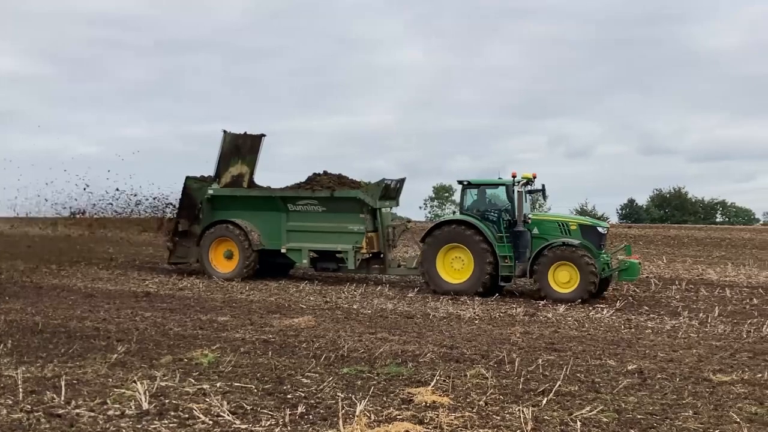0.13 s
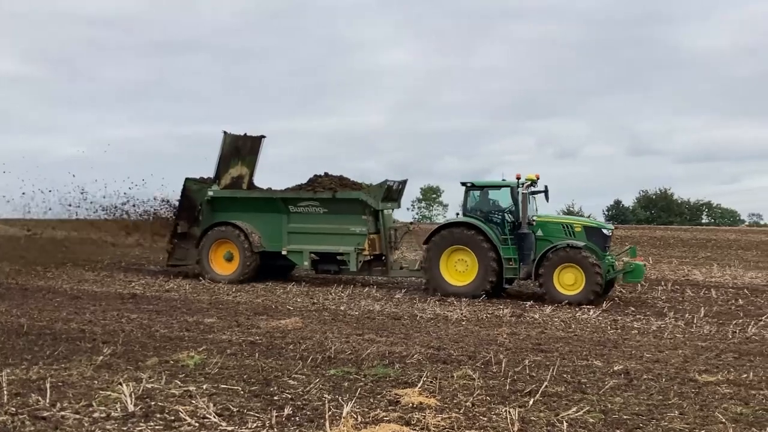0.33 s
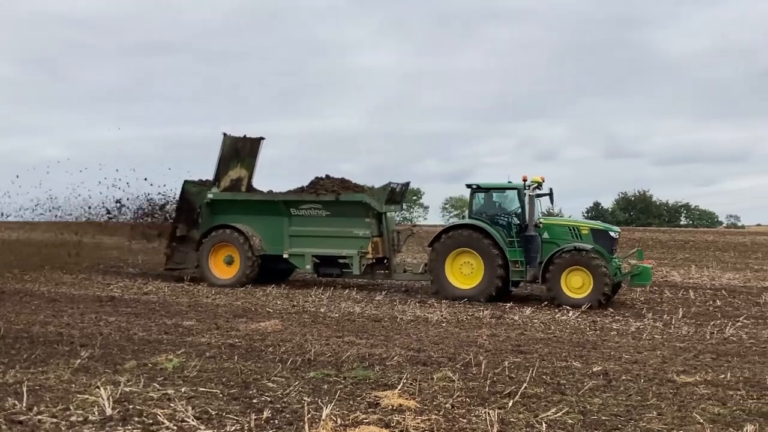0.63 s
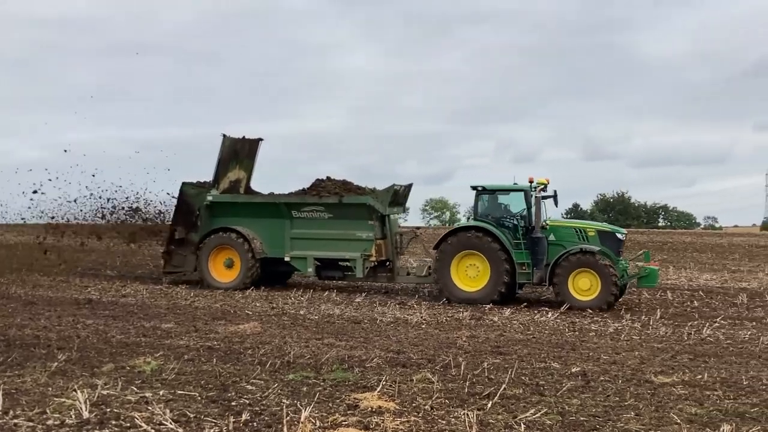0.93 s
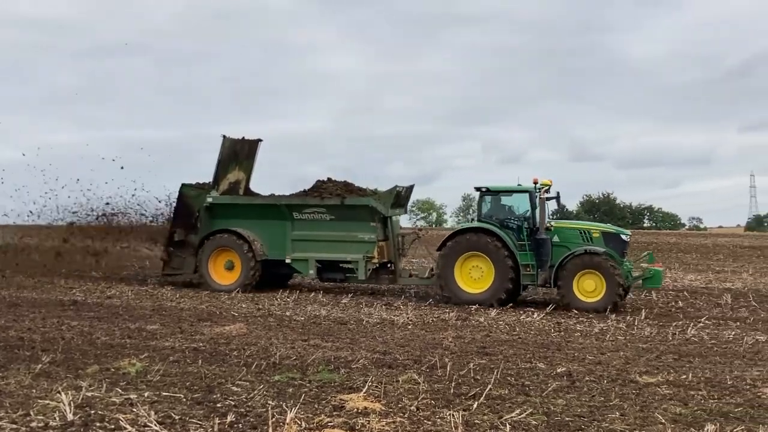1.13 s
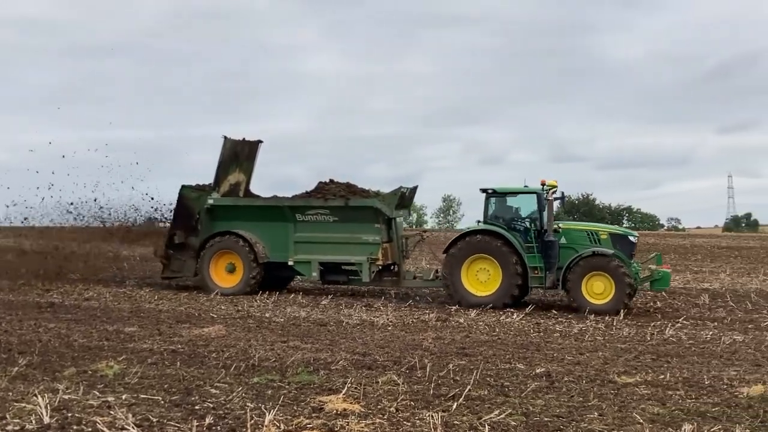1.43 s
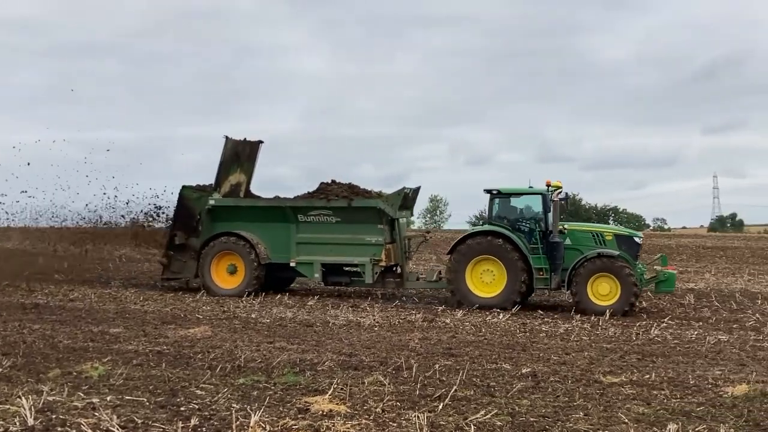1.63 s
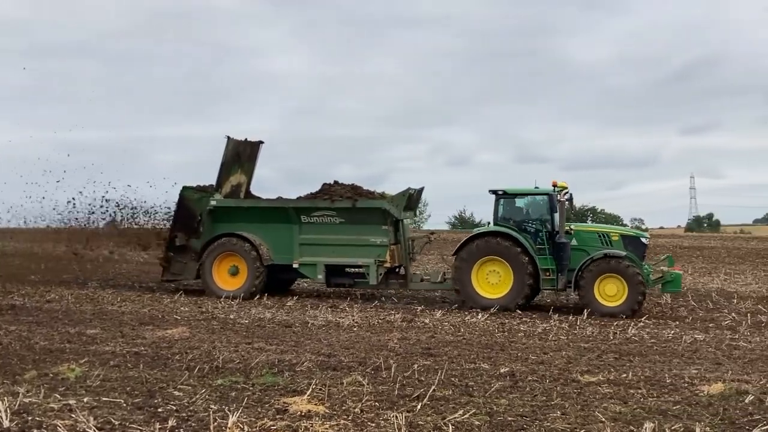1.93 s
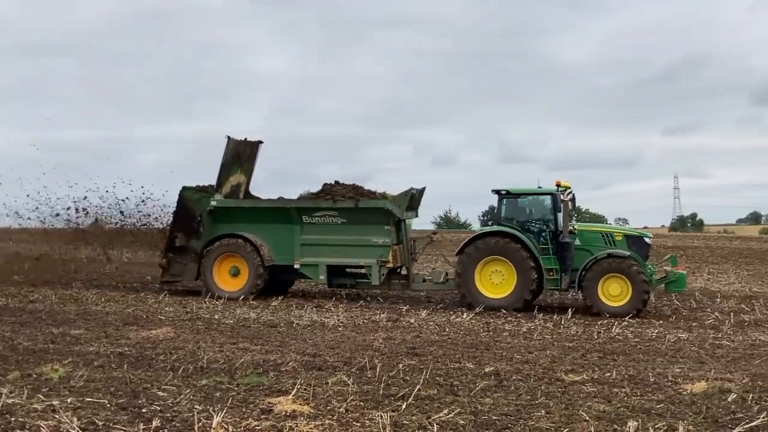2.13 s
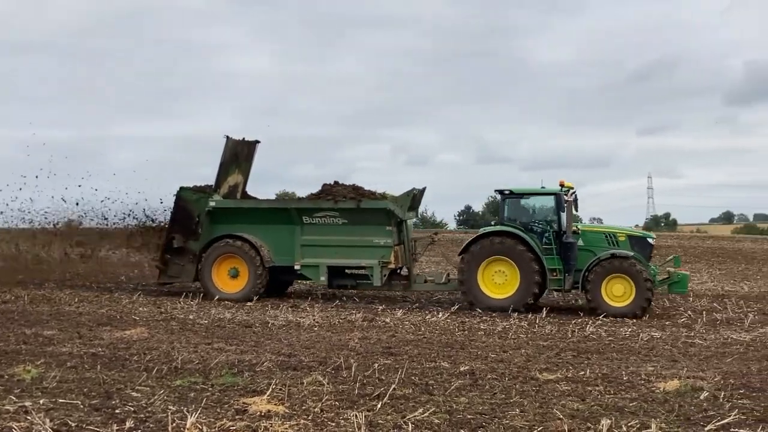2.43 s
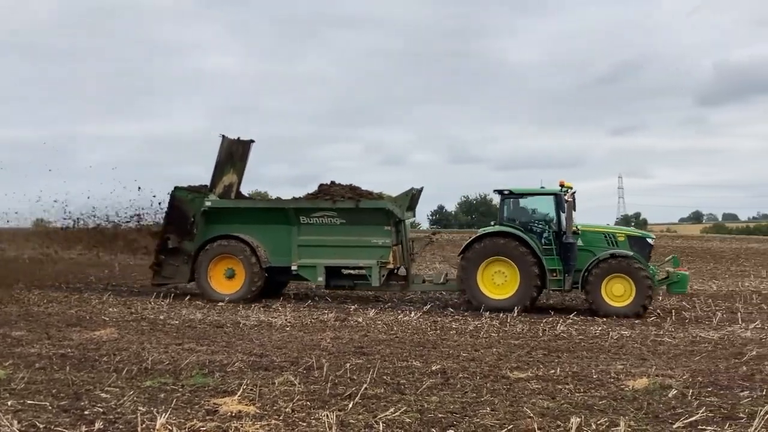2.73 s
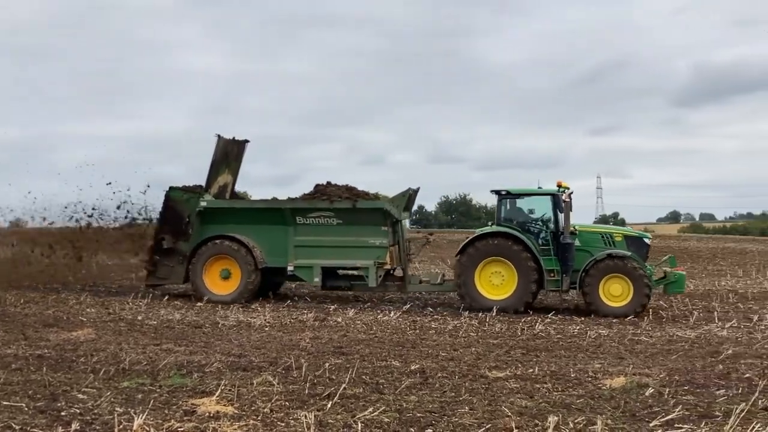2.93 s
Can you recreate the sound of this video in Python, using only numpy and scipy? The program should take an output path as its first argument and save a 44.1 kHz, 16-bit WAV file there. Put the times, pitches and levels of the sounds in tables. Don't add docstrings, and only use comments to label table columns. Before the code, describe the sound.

A tractor and muck spreader drone along with a wavering gear whine, low thumps and pattering clods.

```python
import sys
import numpy as np
from scipy import signal
from scipy.fft import rfft, irfft
from scipy.io import wavfile
from scipy.ndimage import uniform_filter1d

SR = 44100
rng = np.random.default_rng(int(sys.argv[2]) if len(sys.argv) > 2 else 0)


def generate_wav(sig):
    pcm = np.round(np.clip(np.atleast_2d(sig).T, -1, 1) * 32767).astype(np.int16)
    wavfile.write(sys.argv[1], SR, pcm)


def how_loud(loudness_db):
    steps = np.asarray(loudness_db, float) / 20
    return 10 ** steps


N = 136269

# f/Hz, level/dB (per Hz)
ROAR_SPECTRUM = [(28, -19), (60, -4.5), (120, -2.5), (260, -22.5), (660, -17), (1300, -21), (2400, -28),
                 (10000, -50)]
# f/Hz, depth/dB
ROAR_PATCHES = [(300, 2.8), (1000, 2.6), (1500, 1.6), (3000, 2.2)]
# t/s, f/Hz, level/dB
MAIN_WHINE = [(0, 1318, -33), (.12, 1324, -31), (.155, 1332, -45), (.2, 1342, -35), (.45, 1352, -37),
              (.78, 1355, -41), (.85, 1366, -31.5), (1.25, 1366, -33), (1.37, 1348, -31), (1.41, 1361, -46),
              (1.6, 1335, -32), (1.85, 1356, -37), (1.89, 1352, -28.5), (2.4, 1357, -37), (2.58, 1352, -32),
              (2.63, 1350, -50), (2.7, 1360, -32), (3.09, 1364, -33)]
# t/s, f/Hz, level/dB
UPPER_WHINE = [(0, 1660, -43), (.3, 1668, -39), (.55, 1672, -43), (.76, 1680, -48), (.85, 1688, -41),
               (1.36, 1682, -44), (1.55, 1675, -38), (1.62, 1673, -45), (2.5, 1674, -47), (2.83, 1672, -43),
               (3.09, 1675, -46)]
# t/s, f/Hz, level/dB
LOWER_WHINE = [(0, 1150, -43), (.7, 1146, -47), (1.4, 1132, -40.5), (1.9, 1128, -34.5), (2.15, 1138, -44),
               (2.3, 1137, -35.5), (2.47, 1135, -47), (2.62, 1140, -37), (3.09, 1139, -38.5)]
# f/Hz, width/Hz, first level/dB, last level/dB
SIDE_GEARS = [(1985, 40, -41, -54), (1905, 50, -45, -47), (2190, 40, -50, -52), (2385, 50, -53, -53),
              (860, 30, -45, -45), (398, 14, -46, -46), (3770, 50, -45, -56)]
# f/Hz, level/dB (per Hz)
PATTER_SPECTRUM = [(2500, -3), (3800, 3), (6000, -3), (7500, 0), (11000, -3), (13000, -7), (14500, -11),
                   (15700, -20)]
# t/s, level/dB
PATTER_LEVEL = [(0, -38.5), (1.2, -40.5), (2, -37), (2.5, -37), (3.09, -37.5)]
# t/s, peak level/dB, f/Hz, length/s
BLOWS = [(0.004, 0.5, 99, 0.012), (0.03, -21, 71.4, 0.08), (0.155, -5, 124, 0.021),
         (0.192, -7.5, 122, 0.023), (0.236, -12, 126, 0.018), (0.272, -10, 110, 0.028),
         (0.306, -5, 102, 0.017), (0.371, -6, 113, 0.011), (0.415, -10.5, 131.5, 0.024),
         (0.439, -6.5, 105, 0.022), (0.465, -16, 73, 0.04), (0.526, -12, 107.7, 0.059),
         (0.581, -14, 124, 0.044), (0.606, -16.5, 77.5, 0.031), (0.659, -14, 109, 0.02),
         (0.731, -12.5, 105.7, 0.069), (0.954, -13, 129, 0.028), (1.011, -11, 134, 0.03),
         (1.053, -9, 121, 0.012), (1.132, -19, 73.5, 0.076), (1.273, -16, 122, 0.019),
         (1.296, -1, 124, 0.019), (1.373, -11.5, 72.8, 0.023), (1.453, -17, 106, 0.028),
         (1.51, -15.5, 138.6, 0.042), (1.528, -13, 80.4, 0.04), (1.58, -3.5, 80.7, 0.0074),
         (1.688, -16, 68.7, 0.035), (1.719, -18, 112.3, 0.0098), (1.744, -10, 106.5, 0.043),
         (1.806, -22, 130, 0.044), (1.855, -12, 72.5, 0.032), (1.872, -4.5, 95.5, 0.04),
         (1.888, -16, 132.3, 0.031), (1.922, -16.5, 97, 0.042), (2.04, -11.5, 96, 0.0099),
         (2.107, -16.5, 131, 0.04), (2.141, -19, 67.7, 0.044), (2.158, -1, 119, 0.028),
         (2.388, -13.5, 122.2, 0.028), (2.418, -18, 75.5, 0.04), (2.443, -5, 127, 0.028),
         (2.6, -14, 126, 0.044), (2.655, -16, 117, 0.028), (2.713, -4, 128.5, 0.0065),
         (2.73, -6.5, 119, 0.015), (2.887, -12, 96.8, 0.02), (3.016, -10.0, 73, 0.028),
         (3.037, -11.5, 103, 0.028), (3.077, -16.7, 73.8, 0.04)]
# t/s, peak level/dB, struck panel f/Hz
KNOCKS = [(.006, -14, 280), (0.426, -18.5, 401), (.499, -21.5, 680), (.71, -21.5, 640), (1.128, -23.5, 640),
          (1.278, -18.5, 870), (1.284, -20, 674), (1.301, -17.5, 334.5), (1.535, -21, 691),
          (1.56, -16, 328), (1.568, -17, 585), (1.571, -16.5, 872), (1.823, -19, 1260), (1.838, -18.5, 698),
          (1.862, -17, 615), (1.865, -15.5, 302), (1.893, -22.5, 676), (1.892, -17.5, 1153),
          (1.891, -20, 1555), (1.993, -21, 658), (2.148, -14, 660), (2.154, -14.5, 295), (2.415, -19, 317),
          (2.709, -14, 684), (2.806, -23, 634), (2.845, -23, 636), (2.998, -19, 596), (3.003, -18.5, 876),
          (3.005, -19.5, 316), (3.055, -19.5, 352), (3.072, -15, 221.5)]
# f/Hz, level/dB, t60/s
BODY_MODES = [(358, -2, 0.029), (640, 7, 0.031), (860, 8, 0.047), (1120, -18, 0.017), (1620, -19, 0.015),
              (209, 1, 0.046), (435, 11, 0.051)]
# t/s, peak level/dB, brightness/dB
SNAPS = [(.053, -19, -8), (.087, -19, -4), (.487, -15, -3), (.745, -21, -3), (.883, -24, -6),
         (.8888, -15, 0), (1.030, -17, 0), (1.215, -22, 0), (1.346, -21, -5), (1.629, -23, -4),
         (1.683, -23, -5), (1.747, -14, 1), (1.947, -22, -3), (2.009, -21, -7), (2.033, -19, -5),
         (2.094, -23, -6), (2.418, -22, -8), (2.4365, -21, -6), (2.4842, -16, -3), (2.489, -16, -14),
         (2.4945, -18, -10), (2.548, -24, 2), (2.6058, -17, 7), (2.6615, -21, -6), (2.7072, -13, -3),
         (2.781, -19, -8), (2.865, -23, -6), (2.992, -18, -7)]
# f/Hz, level/dB
SNAP_DULL = [(1200, -22), (3100, 0), (6000, -4), (8000, -3), (10500, -10), (14000, -30)]
# f/Hz, level/dB
SNAP_BRIGHT = [(7000, -30), (10500, -4.5), (13000, -3), (16000, -11)]
# t/s, peak level/dB, f/Hz
TINKS = [
    (.708, -29, 2900),
    (1.378, -28, 3350),
    (2.009, -28, 5200),
    (2.4875, -23, 3200),
    (2.494, -24, 3400),
    (2.7062, -21, 3600),
    (2.7066, -25, 5100),
    (2.707, -27, 7800),
    (2.781, -26, 5100),
]
# f/Hz, lead/rad
PORT_LEAD = [(0, 0), (1200, -.6), (2200, -.4), (3300, -1.7), (3900, -4.1), (5200, -4.5), (6000, -2.5),
             (6700, .1)]
# f/Hz, likeness
PORT_LIKENESS = [(80, .55), (1300, .58), (2100, .45), (3000, .6), (3700, .2), (4800, .68), (6300, .35),
                 (7200, .9)]
# f/Hz, level/dB
PORT_SHADE = [(1900, 0), (2700, -5), (3700, 0), (4800, 1), (6200, -3.5), (7000, 0)]

ROAR_DB = -21.5
WHINE_WIDTH_HZ, WHINE_FUZZ, WHINE_DRIFT_HZ = 40, 0.48, 5
CRUMBS_PER_S, CRUMB_SPREAD_DB, CRUMB_T60_S, HISS_DB = 1500, 4, 0.004, 2
RISE, FALL = 0.76, 0.28
THUMP_LEAD_S = 0.06
BLADES_PER_S, BLADE_DB, BLADE_SPREAD_DB = 70, -22.5, 2
BLADE_HZ, BLADE_S = (58, 143), (0.0096, 0.016)
KNOCK_S, RATTLE = 0.009, 1.53
STRUCK_T60_S, BODY_DB = 0.075, 3
SNAP_DB, SNAP_T60_S, SNAP_TAIL_DB, SNAP_TAIL_S = 7.5, 0.003, -17, 0.035
TINK_T60_S = 0.02
PORT_DELAY_S = 0.00022
LOW_HZ, EDGE_HZ = 43, 15800


def evened(x):
    return x / np.sqrt(np.mean(x ** 2) + 1e-20)


def read(points, hz):
    f, value = np.transpose(points)
    return np.interp(np.log(hz + 1), np.log(f + 1), value)


def curve(points, axis=1):
    columns = np.transpose(points)
    return np.interp(np.arange(N) / SR, columns[0], columns[axis])


def add(mix, s, sound):
    at = round(s * SR)
    part = mix[max(at, 0):][:len(sound) + min(at, 0)]
    part += sound[max(-at, 0):][:len(part)]


def coloured(x, points):
    hz = np.fft.rfftfreq(len(x), 1 / SR)
    return irfft(rfft(x) * how_loud(read(points, hz)), len(x))


def roar():
    frames, hz = N // 256 + 5, np.fft.rfftfreq(1024, 1 / SR)
    a, b, patches = rng.standard_normal((frames, 513, 3)).T
    patches = uniform_filter1d(patches, size=10, axis=0)
    patches = evened(uniform_filter1d(patches, size=8, axis=1))
    level = read(ROAR_SPECTRUM, hz)[:, None] + read(ROAR_PATCHES, hz)[:, None] * patches
    noise = signal.istft((a + 1j * b) * how_loud(level), nperseg=1024, noverlap=768)[1]
    return how_loud(ROAR_DB) * evened(noise[:N])


def whistle(hz, width):
    r = np.exp(-np.pi * width / SR)
    noise = rng.standard_normal((N + SR, 2)) @ [1, 1j]
    wobble = signal.lfilter([1], np.convolve([1, -r], [1, -r]), noise)[SR:]
    carrier = np.exp(2j * np.pi * np.cumsum(hz * np.ones(N)) / SR)
    return wobble / np.sqrt(np.mean(abs(wobble) ** 2)), carrier


def gears():
    drift = uniform_filter1d(rng.standard_normal(N), size=1500)
    drift = evened(uniform_filter1d(drift, size=1500))
    out = np.zeros(N)
    for mesh in MAIN_WHINE, UPPER_WHINE, LOWER_WHINE:
        wobble, carrier = whistle(curve(mesh) + WHINE_DRIFT_HZ * drift, WHINE_WIDTH_HZ)
        level = np.sqrt(2) * how_loud(curve(mesh, axis=2) + 1.0)
        out += level * ((1 + WHINE_FUZZ * wobble) * carrier).real
    for f, width, first_db, last_db in SIDE_GEARS:
        wobble, carrier = whistle(f + 0.5 * WHINE_DRIFT_HZ * drift, width)
        out += how_loud(np.linspace(first_db, last_db, N)) * ((0.6 + wobble) * carrier).real
    return out


def patter():
    spread = CRUMB_SPREAD_DB * np.minimum(rng.exponential(1, N), 5)
    impacts = how_loud(spread) * (rng.random(N) < CRUMBS_PER_S / SR)
    kind, t = rng.integers(0, 12, N), np.arange(300) / SR
    crumbs = np.zeros(N)
    for k in range(12):
        burst = rng.standard_normal(300) * how_loud(-60 * t / CRUMB_T60_S)
        crumbs += signal.oaconvolve(impacts * (kind == k), burst)[:N]
    gust = evened(uniform_filter1d(rng.standard_normal(N), size=700))
    bed = (evened(crumbs) + how_loud(HISS_DB) * rng.standard_normal(N)) * how_loud(1.7 * gust)
    return how_loud(curve(PATTER_LEVEL)) * evened(coloured(bed, PATTER_SPECTRUM))


def thump(db, hz, length):
    t = np.arange(-THUMP_LEAD_S, 0.06, 1 / SR)
    swell = np.exp(-(t / (length * np.where(t < 0, RISE, FALL))) ** 2)
    return -how_loud(db) * swell * np.sin(2 * np.pi * hz * t)


def blade_blows():
    out = np.zeros(N)
    for s, db, hz, length in BLOWS:
        add(out, s - THUMP_LEAD_S, thump(db, hz, length))
    for when, a, b, c in rng.random((int(BLADES_PER_S * N / SR), 4)):
        db = BLADE_DB - BLADE_SPREAD_DB * np.log(a + 0.3)
        hz, length = np.interp(b, [0, 1], BLADE_HZ), np.interp(c, [0, 1], BLADE_S)
        add(out, when * N / SR - THUMP_LEAD_S, thump(db, hz, length))
    return out


def body_knocks():
    out, t = np.zeros(N), np.arange(4000) / SR
    draws = rng.standard_normal((len(KNOCKS), 2, 4000))
    for (s, db, struck_hz), (push, colour) in zip(KNOCKS, draws):
        struck = np.sin(2 * np.pi * struck_hz * t)
        ring = np.zeros(4000)
        for k, (f, d, t60) in enumerate(BODY_MODES):
            mode_hz = f * (1 + 0.02 * colour[k + 9])
            ring += how_loud(d + 3.8 * colour[k] - 60 * t / t60) * np.sin(2 * np.pi * mode_hz * t)
        ring = how_loud(BODY_DB) * ring + how_loud(-60 * t / STRUCK_T60_S) * struck
        force = (push + 0.55 * struck) * np.exp(-(t / KNOCK_S - 1) ** 2 * 2)
        hit = signal.fftconvolve(force, ring)[:4000]
        rattle = uniform_filter1d(push, size=24) * np.exp(-2 * (t / KNOCK_S - 1.3) ** 2)
        add(out, s - KNOCK_S * 1.6, how_loud(db) * (hit / abs(hit).max() + RATTLE * rattle))
    return out


def snaps():
    dull, bright, t = np.zeros(N), np.zeros(N), np.arange(2500) / SR
    for (s, db, bright_db), z in zip(SNAPS, rng.standard_normal((len(SNAPS), 2500))):
        decay = how_loud(-60 * t / SNAP_T60_S) + how_loud(SNAP_TAIL_DB - 60 * t / SNAP_TAIL_S)
        snap = np.clip(z, -1, 1) * decay
        add(dull, s, how_loud(db + SNAP_DB) * snap)
        add(bright, s, how_loud(db + SNAP_DB + bright_db) * snap)
    return coloured(dull, SNAP_DULL) + coloured(bright, SNAP_BRIGHT)


def tinks():
    out, t = np.zeros(N), np.arange(2500) / SR
    for s, db, hz in TINKS:
        attack = np.minimum(t * 1000, 1)
        add(out, s, how_loud(db - 60 * t / TINK_T60_S) * attack * np.sin(2 * np.pi * hz * t))
    return out


def ports(events, bed, apart):
    hz = np.fft.rfftfreq(2 * N, 1 / SR)
    f, lead = np.transpose(PORT_LEAD)
    lead = np.interp(hz, f, lead) + 2 * np.pi * PORT_DELAY_S * np.maximum(hz - f[-1], 0)
    same = read(PORT_LIKENESS, hz)
    shared = rfft(events, 2 * N) + np.sqrt(same) * rfft(bed, 2 * N)
    direct = [shared, shared * np.exp(1j * lead)]
    left, right = direct + np.sqrt(1 - same) * rfft(apart, 2 * N)
    return irfft([left, right * how_loud(read(PORT_SHADE, hz))])[:, :N]


def scene():
    bed, *apart = [roar() + patter() for _ in range(3)]
    events = gears() + blade_blows() + body_knocks() + snaps() + tinks()
    return ports(events, bed, np.array(apart))


def band_limit(x):
    return signal.sosfilt(signal.butter(12, 16260, fs=SR, output="sos"), x)


def record(dry):
    hz = np.fft.rfftfreq(2 * N, 1 / SR)
    loss = np.sqrt((1 + (LOW_HZ / (hz + 1)) ** 6) * (1 + (hz / EDGE_HZ) ** 200))
    x = irfft(rfft(dry, 2 * N) / loss)[:, :N]
    return band_limit(np.tanh(x / 1.67) * 1.53)


dry = scene()
out = record(dry)
generate_wav(out)
```